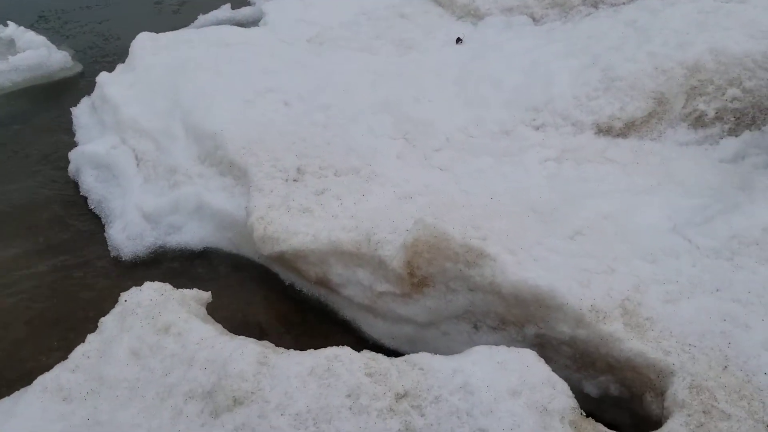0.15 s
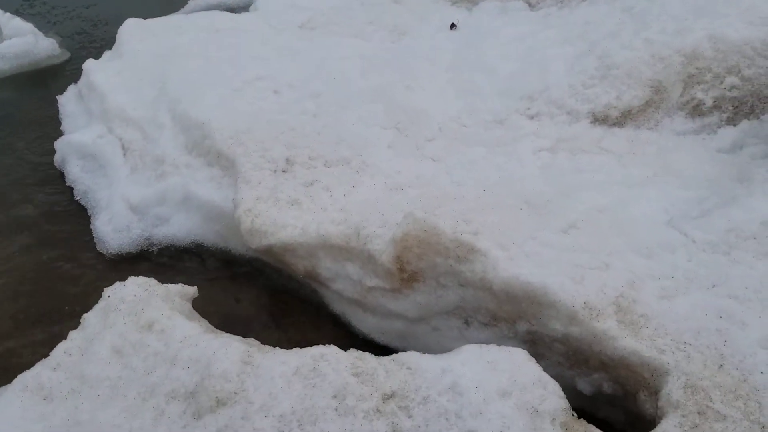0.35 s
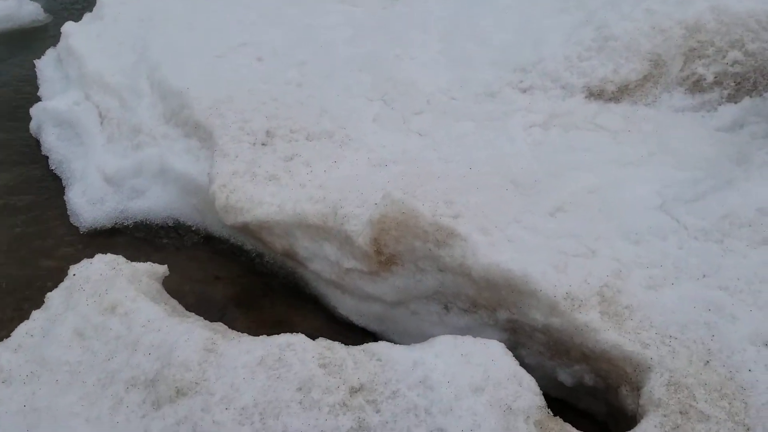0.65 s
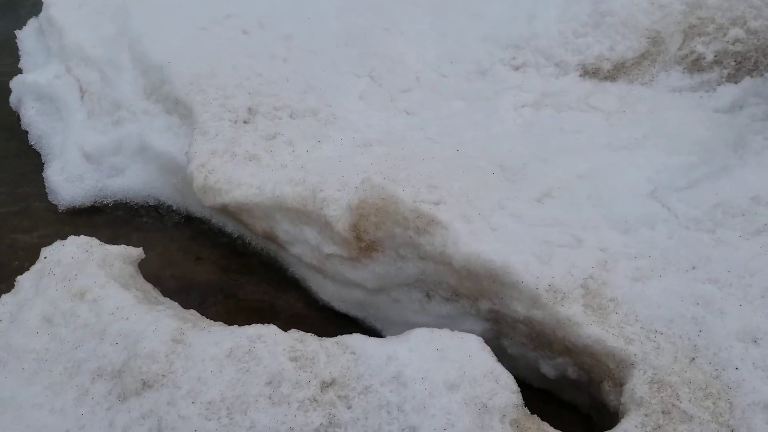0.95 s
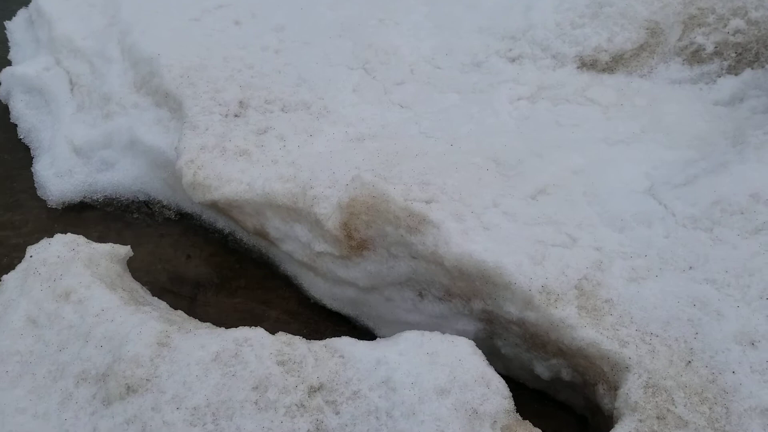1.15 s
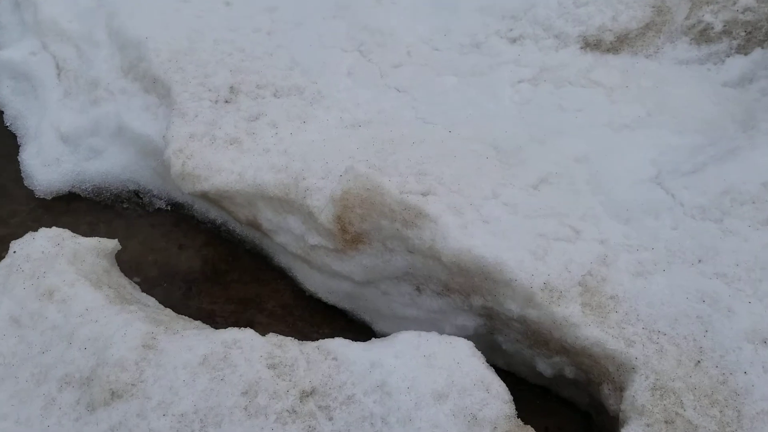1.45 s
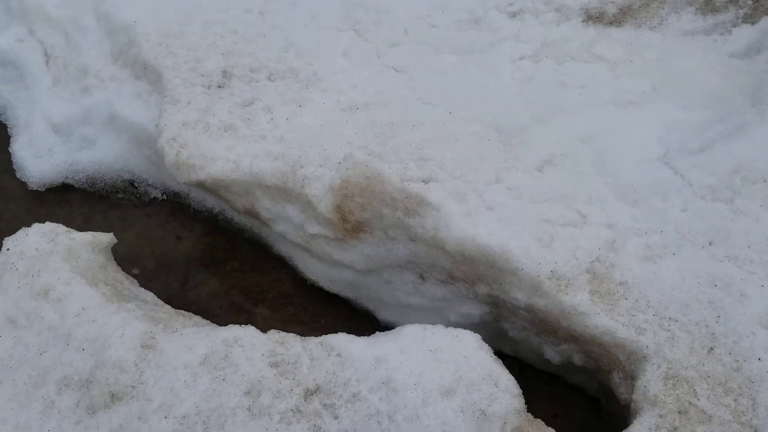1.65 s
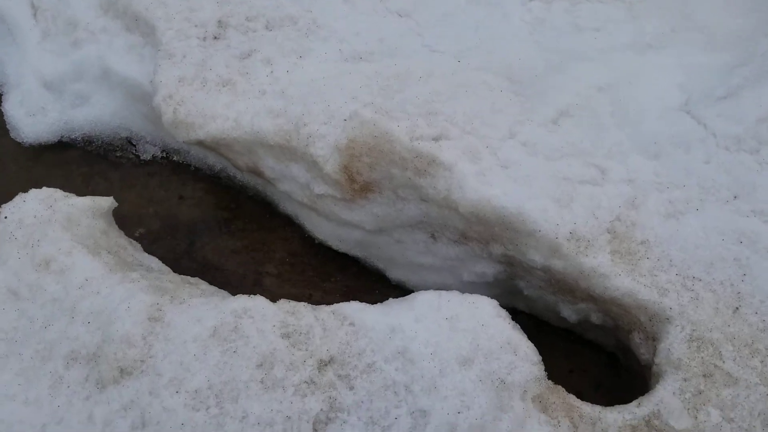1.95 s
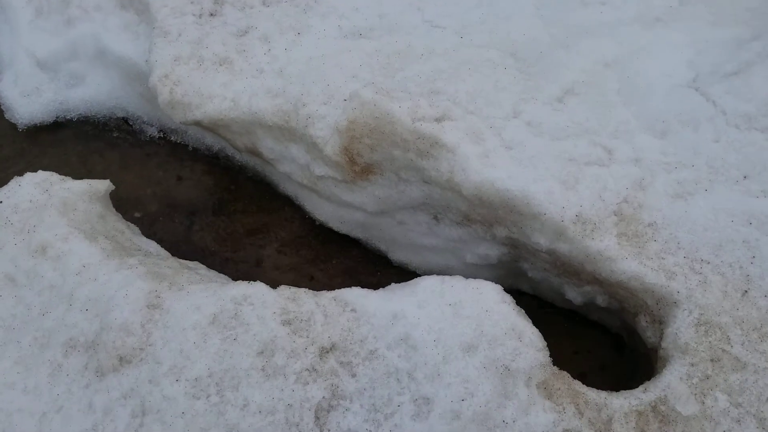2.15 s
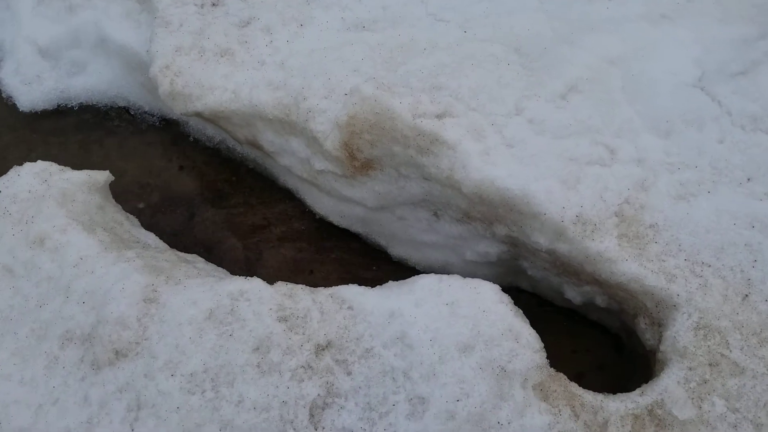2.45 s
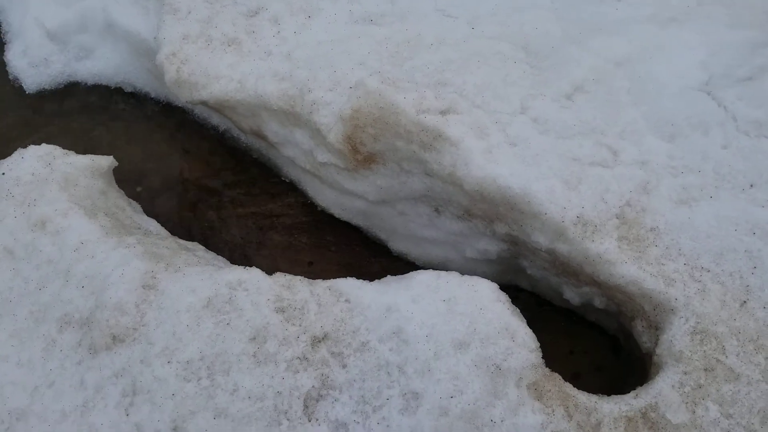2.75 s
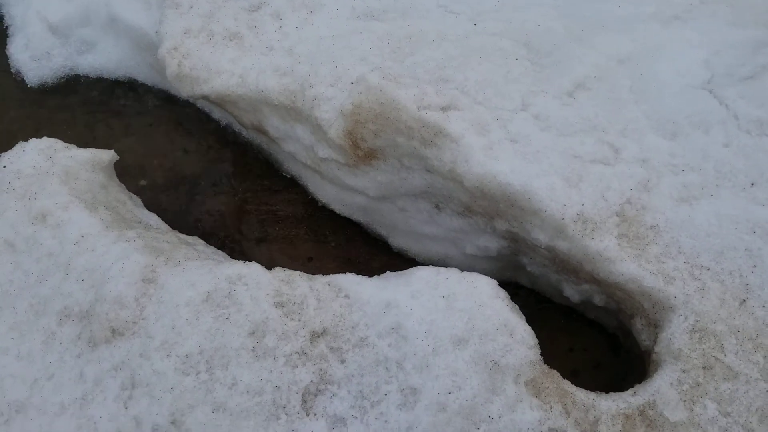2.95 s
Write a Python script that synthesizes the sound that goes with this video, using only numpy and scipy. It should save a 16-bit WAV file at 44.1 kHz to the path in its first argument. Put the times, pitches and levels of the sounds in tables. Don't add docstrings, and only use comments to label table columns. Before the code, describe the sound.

Ice knocking and splintering beside a water channel, in three crackling bursts with wind rumble

```python
import sys
import numpy as np
from scipy import signal
from scipy.fft import rfft, irfft
from scipy.io import wavfile
from scipy.ndimage import uniform_filter1d, minimum_filter1d

SR = 44100
rng = np.random.default_rng(int(sys.argv[2]) if len(sys.argv) > 2 else 0)


def convert_level_to_amplitude(level_db):
    exponent = np.asarray(level_db, float) / 20
    return 10 ** exponent


def bounce(signal):
    frames = np.transpose(np.atleast_2d(signal))
    limited = np.clip(frames, -1, 1)
    pcm = np.round(limited * 32767).astype(np.int16)
    wavfile.write(sys.argv[1], SR, pcm)


N = 136710

# time in seconds, level in dB.
WASH_SWELL = [
    (0, -46.5),
    (1.8, -43.5),
    (2.15, -48),
    (2.7, -47),
    (3.1, -50.5),
]
# frequency in Hz, level in dB.
WASH_SPECTRUM = [(300, 8), (1100, -7.5), (1800, -3.5), (3300, -14), (5500, -14.5), (8300, -21),
                 (12500, -17), (15800, -21)]
# time in seconds, level in dB.
GUST = [
    (0, -52.5),
    (.45, -37),
    (.8, -45),
    (1.3, -40),
    (2.1, -43.5),
    (2.5, -44),
    (3.1, -44.5),
]
# frequency in Hz, level in dB.
WIND_SPECTRUM = [(20, -10.5), (75, -1.5), (280, -13), (800, -25.5)]
# centre in seconds, peak in dB, frequency in Hz.
BUFFETS = [(0.3, -28.5, 173), (0.449, -27.5, 280), (0.467, -31.5, 160), (0.563, -28, 146),
           (0.605, -22, 137), (0.651, -26, 125), (0.83, -29, 303), (0.914, -29.5, 89), (0.982, -27, 141),
           (1.034, -35, 150), (1.102, -28, 182), (1.153, -26, 83), (1.181, -31, 88.6), (1.218, -28, 84),
           (1.298, -27.5, 91), (1.339, -24.5, 248), (1.375, -23.5, 82), (1.407, -27.5, 116),
           (1.479, -24, 138), (1.503, -25, 128), (1.534, -23, 257), (1.611, -27.5, 130), (1.667, -28.5, 97),
           (1.712, -26, 109), (1.812, -24, 149), (1.854, -34, 193), (1.886, -24, 216), (2.23, -30.5, 95),
           (2.3, -21, 290), (2.375, -29.5, 120), (2.404, -22, 76.5), (2.449, -27.5, 174), (2.501, -27, 123),
           (2.628, -29, 149), (2.686, -31, 144), (2.8, -32, 142), (2.84, -26.5, 117), (2.885, -29.5, 95)]
# start in seconds, length in seconds, body in dB, fizz in dB.
CRUNCHES = [(0.226, 0.028, -53, -73), (0.385, 0.091, -40, -47), (0.562, 0.0079, -28.5, -44),
            (0.582, 0.086, -44, -57), (0.765, 0.07, -42, -45), (0.826, 0.017, -33, -41),
            (1.472, 0.01, -26, -32), (1.525, 0.062, -41.5, -43), (1.896, 0.023, -40, -43),
            (1.967, 0.049, -46.5, -54), (2.059, 0.015, -47, -52), (2.295, 0.038, -36, -36),
            (2.345, 0.038, -46.5, -43.5), (2.436, 0.026, -40.5, -43)]
# time in seconds, knock in dB, knock in Hz, splinter in dB.
CRACKS_1 = [(0.2394, -27.5, 910, -41), (0.3317, -20.5, 1320, -33), (0.3943, -21.5, 1370, -21.5),
            (0.4021, -18.5, 780, -37), (0.4064, -23, 1590, -47), (0.4119, -35, 2190, -45),
            (0.4185, -21, 1570, -40), (0.4236, -21, 1260, -47), (0.4286, -32, 1800, -39),
            (0.4374, -25, 1250, -42), (0.441, -20.5, 840, -46), (0.4456, -10, 1310, -26),
            (0.4523, -25, 1460, -48), (0.4616, -35, 1680, -43), (0.4792, -27, 1120, -41),
            (0.4922, -23, 1420, -38), (0.5476, -24, 1420, -34.5), (0.5652, -14, 880, -39.5),
            (0.5879, -15.5, 1310, -34.5), (0.6073, -20.5, 704, -41), (0.63, -16.5, 1480, -36),
            (0.72, -18, 1040, -26.5),
            (0.7733, -31.5, 1230, -45), (0.8004, -17, 1330, -33), (0.8034, -19.5, 1410, -43),
                 (0.811, -22, 1290, -49), (0.8188, -27, 1200, -37), (0.824, -23, 1150, -48),
                 (0.8287, -13.5, 970, -29), (0.8364, -28, 2180, -56), (0.8493, -31, 735, -35.5),
                 (0.8766, -22.5, 1447, -39.5), (0.9567, -15, 920, -43), (1.0102, -20, 1200, -35),
                 (1.0136, -19.5, 1270, -35), (1.0407, -25, 1370, -55), (1.0445, -26, 870, -50),
                 (1.0545, -28, 1670, -46), (1.0659, -26.5, 1260, -53), (1.0878, -25, 1360, -39),
                 (1.1042, -17.5, 1790, -36.5), (1.1063, -26.5, 1370, -48), (1.1833, -27, 1770, -59)]
# time in seconds, knock in dB, knock in Hz, splinter in dB.
CRACKS_2 = [(1.4717, -12.5, 1200, -31.5), (1.476, -23.5, 1270, -25.5), (1.5269, -21, 1730, -27),
            (1.5339, -14, 1740, -23.5), (1.5506, -27, 1940, -48), (1.5594, -27, 1020, -34),
            (1.564, -25, 1820, -37), (1.5652, -25, 1830, -35), (1.574, -14, 940, -28.5),
            (1.6098, -24, 1730, -31), (1.645, -15, 1660, -27), (1.6507, -22, 970, -32),
            (1.6834, -13, 1720, -27), (1.6877, -24, 1790, -23.5), (1.6916, -29, 1500, -34),
            (1.7064, -30, 1960, -40), (1.7537, -18, 740, -27), (1.78, -18, 890, -31.5),
            (1.8121, -16.5, 714, -26), (1.8218, -20.5, 1850, -33.5), (1.8276, -20.5, 1870, -35),
            (1.839, -16, 2090, -33), (1.8445, -17, 1920, -33), (1.9015, -34, 2100, -53),
            (1.9067, -18, 2020, -24.5), (1.9418, -20.5, 1170, -33.5), (1.9548, -28, 1220, -40),
            (1.9809, -23, 700, -43), (1.9843, -29, 1290, -48), (1.9913, -22.5, 1070, -33.5),
            (2.0104, -25.5, 865, -52), (2.0433, -17.5, 1640, -33), (2.0636, -29, 1900, -44)]
# time in seconds, knock in dB, knock in Hz, splinter in dB.
CRACKS_3 = [(2.304, -19.5, 970, -25), (2.3543, -23, 1600, -32), (2.3611, -23.5, 700, -48),
            (2.3673, -24.5, 1260, -37), (2.408, -32, 1580, -27), (2.4108, -23, 1350, -48),
            (2.4154, -19, 940, -25), (2.4442, -24, 1030, -22), (2.4457, -29, 830, -49),
            (2.4697, -25.5, 1540, -34.5), (2.606, -26.5, 1860, -33), (2.6092, -27, 1850, -36),
            (2.6202, -26, 870, -29)]
# time in seconds, level in dB.
LONE_SPLINTERS = [(0.0672, -44.5), (0.228, -37), (0.358, -36.5), (0.4007, -44), (0.4328, -32),
                  (0.4635, -42), (0.5623, -26.5), (0.6163, -41), (1.0948, -38), (1.4724, -25.5),
                  (1.5414, -50), (1.6344, -37), (1.7358, -41), (1.899, -34), (2.0062, -31.5),
                  (2.0828, -35.5), (2.2812, -33.5), (2.3224, -37), (2.345, -42), (2.4326, -38),
                  (2.4595, -39), (2.5357, -37.5), (2.5486, -58), (2.6167, -43), (2.6373, -43), (2.649, -39),
                  (2.68, -43.5), (2.7365, -44), (2.766, -46), (2.7789, -30.5)]
# frequency in Hz, level in dB.
SPLINTER_SPECTRUM = [(2200, -4), (3600, -12.5), (6450, 2), (8000, -11.5), (12000, -0.5), (15800, -11)]
# frequency in Hz, gain in dB.
BODY_COLOUR = [(150, 2.5), (500, 2), (1250, -1), (1900, -1.5), (2700, 4.5), (4000, 16.5)]

TRICKLE_DB, TRICKLE_PER_S = -49.5, 25
BUFFET_CYCLES = 0.55
KNOCK_PEAK_S, GRAIN_PEAK_S = 0.0009, 0.00063
RING_DB, RING_S = -6, 0.0013
SPLINTER_S, SPLINTER_TILT_DB = 0.001, 2.5
PORT_LAG_SAMPLES = 4
STARVE_DB = -22.5


def evened(x):
    return x / np.sqrt(np.mean(x ** 2) + 1e-20)


def coloured(x, points):
    f, db = np.transpose(points)
    hz = np.fft.rfftfreq(N, 1 / SR) + 1
    gain = convert_level_to_amplitude(np.interp(np.log(hz), np.log(f), db, -80, -80))
    return irfft(rfft(x) * gain, N)


def drift(per_s, channels):
    step = int(SR / per_s)
    noise = rng.standard_normal((channels, N))
    return evened(uniform_filter1d(uniform_filter1d(noise, step), step))


def impulses(per_s, spread_db, most, shape=N):
    hits = rng.random(shape) < per_s / SR
    return hits * convert_level_to_amplitude(spread_db * np.minimum(rng.exponential(1, N), most))


def add(mix, s, sound):
    part = mix[..., round(s * SR):][..., :sound.shape[-1]]
    part += sound[..., :part.shape[-1]]


def wash():
    level_db = np.interp(np.arange(N) / SR, *np.transpose(WASH_SWELL))
    hiss = evened(coloured(rng.standard_normal((2, N)), WASH_SPECTRUM))
    return hiss * convert_level_to_amplitude(level_db + drift(60, channels=1) / 2)


def trickle():
    out, t = np.zeros((2, N)), np.arange(1024) / SR
    envelope = np.exp(-t / 0.0061) * np.minimum(t / 0.0006, 1)
    for hz in np.geomspace(1500, 2600, num=8):
        drops = impulses(TRICKLE_PER_S / 8, 4.4, 2, (2, N))
        bubble = np.sin(2 * np.pi * hz * t * (1 + 2.6 * t)) * envelope
        out += signal.oaconvolve(drops + 0.5 * drops[::-1], bubble[None], axes=1)[:, :N]
    return convert_level_to_amplitude(TRICKLE_DB) * out


def wind():
    t = np.arange(N) / SR
    rumble = evened(coloured(rng.standard_normal((2, N)), WIND_SPECTRUM))
    lumps_db = 11.1 * np.tanh(0.5 * drift(69, channels=2))
    out = rumble * convert_level_to_amplitude(np.interp(t, *np.transpose(GUST)) + lumps_db + [[0.8], [-0.8]])
    for (s, db, hz), chance in zip(BUFFETS, rng.random((len(BUFFETS), 2))):
        turns = (t[:2048] - t[1024]) * hz
        apart_turns = np.array([[1], [-1]]) * (chance[1] - 0.5) * 30 / hz
        swing = np.sin(2 * np.pi * (turns + chance[0] + apart_turns))
        puff = swing * np.exp(-(turns / BUFFET_CYCLES) ** 2)
        add(out, s - t[1024], convert_level_to_amplitude(db + np.array([[1.5], [-1.5]])) * puff)
    return out


def slush():
    out, t = np.zeros((2, N)), np.arange(N) / SR
    for s, length_s, body_db, fizz_db in CRUNCHES:
        swell_db = -1800 * np.maximum(s - t, 0)
        sag_db = -6 * np.maximum(t - s, 0) / length_s
        stop_db = -4100 * np.maximum(t - s - length_s, 0)
        out += convert_level_to_amplitude([[body_db], [fizz_db]]) * convert_level_to_amplitude(swell_db + sag_db + stop_db)
    return out


def knock(hz, peak_s, chance):
    t = np.arange(1024) / SR
    rise = t / peak_s
    second_hz = (850 if hz > 1450 else 1850) * (0.85 + 0.26 * chance[1])
    second = np.sin(2 * np.pi * (t * second_hz + chance[2]))
    tone = np.sin(2 * np.pi * (t * hz + chance[0]))
    envelope = rise ** 1.57 * np.exp(1.38 * (1 - rise ** 1.58))
    snap = envelope * (tone + chance[3] * second)
    decay = np.exp(-t / (RING_S * (0.18 + chance[4])))
    return snap + convert_level_to_amplitude(RING_DB) * np.minimum(rise, 1) ** 2 * decay * tone


def knocks(cracks):
    out = np.zeros((2, N))
    for (s, db, hz, _), chance in zip(cracks, rng.random((len(cracks), 7))):
        sound = convert_level_to_amplitude(db) * knock(hz, KNOCK_PEAK_S, chance)
        lag_s = PORT_LAG_SAMPLES * (0.35 + 0.9 * chance[5]) / SR
        side = chance[6] - 0.5
        add(out[0], s - KNOCK_PEAK_S + lag_s, sound * convert_level_to_amplitude(2.7 * side))
        add(out[1], s - KNOCK_PEAK_S, sound / convert_level_to_amplitude(5.6 * side))
    return out


def splinters(cracks):
    out, t = np.zeros((2, N)), np.arange(1024) / SR - 0.006
    skirt = np.exp(-np.maximum(t / 0.009, -t / 0.0018))
    burst = np.exp(-(t / SPLINTER_S) ** 2) + 0.043 * skirt
    events = [(row[0], row[3]) for row in cracks] + LONE_SPLINTERS
    for (s, db), tilt in zip(events, rng.uniform(-1.84, 1, len(events))):
        tilt_db = 1.62 + SPLINTER_TILT_DB * np.clip(tilt, -1, 1)
        add(out, s + t[0], convert_level_to_amplitude(db + tilt_db * np.array([[1], [-1]])) * burst)
    return out


def grains(pressure):
    out = np.zeros((2, N))
    for hz in np.geomspace(420, 2500, num=16):
        hits = (pressure + convert_level_to_amplitude(-58.5)) * impulses(45, 4.5, 3)
        swarm = signal.oaconvolve(hits, knock(hz, GRAIN_PEAK_S, rng.random(5)))[:N]
        out += np.array([np.roll(swarm, rng.integers(2 * PORT_LAG_SAMPLES) - 1), swarm])
    return out


def crumble(pressure):
    ticks = signal.oaconvolve(impulses(220, 2.2, 3), np.hanning(80), "same")
    ticks = ticks * convert_level_to_amplitude(1.8 * drift(200, channels=2))
    grind = pressure * convert_level_to_amplitude(-4.5 + 2.9 * drift(230, channels=2))
    return grind + 0.63 * (pressure + convert_level_to_amplitude(-56)) * ticks


def ice():
    cracks = CRACKS_1 + CRACKS_2 + CRACKS_3
    body_pressure, fizz_pressure = slush()
    body = knocks(cracks) + grains(body_pressure)
    fizz_low, fizz_high = splinters(cracks) + crumble(fizz_pressure)
    a, b = rng.standard_normal((2, N))
    unlike = 0.6 * signal.hilbert(a).imag + 0.75 * b
    grit = evened(coloured(np.array([a, unlike]), SPLINTER_SPECTRUM))
    low = signal.sosfiltfilt(signal.butter(4, 8300, fs=SR, output="sos"), grit)
    return coloured(body, BODY_COLOUR) + fizz_low * low + fizz_high * (grit - low)


def scene():
    near, t = ice(), np.arange(2048) / SR
    scatter = rng.standard_normal((2, 2048)) * convert_level_to_amplitude(-60 * t / 0.024) * (t > 0.0015)
    scatter = scatter / np.linalg.norm(scatter[0])
    wet = signal.fftconvolve(near, scatter, axes=1)[:, :N]
    return near + convert_level_to_amplitude(-9.5) * wet + wind() + wash() + trickle()


def top_cut(x):
    return signal.sosfilt(signal.butter(12, 16990, fs=SR, output="sos"), x)


def record(dry):
    hz, _, z = signal.stft(dry, SR, nperseg=256)
    power = uniform_filter1d(uniform_filter1d(abs(z) ** 2, size=4, axis=1), size=2, axis=2)
    nearby_peak = -minimum_filter1d(-power, size=17, axis=2)
    starved = (power < nearby_peak * convert_level_to_amplitude(2 * STARVE_DB)) & (hz[:, None] > 3800)
    kept = signal.istft(z * ~starved, SR, nperseg=256)[1][:, :N]
    return top_cut(0.58 * np.tanh(kept / 0.62))


dry = scene()
out = record(dry)
bounce(out)
```